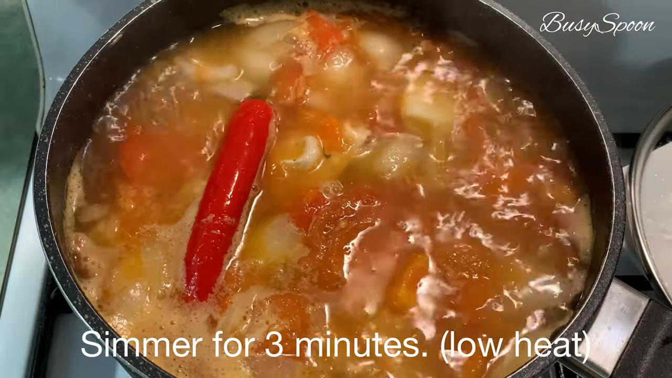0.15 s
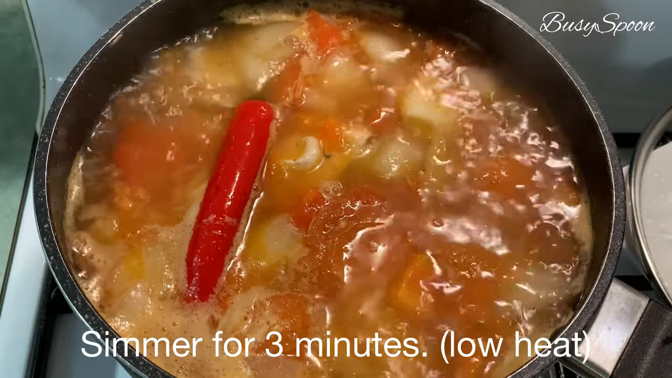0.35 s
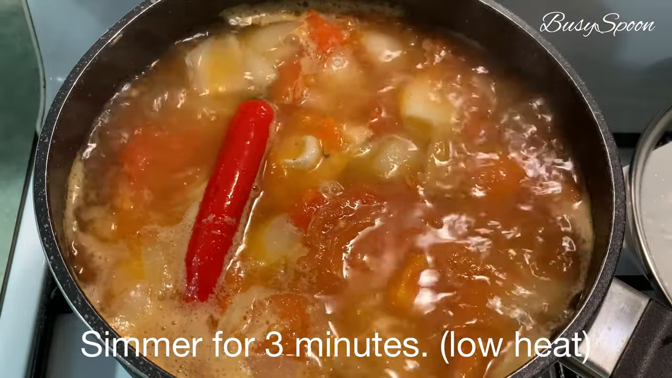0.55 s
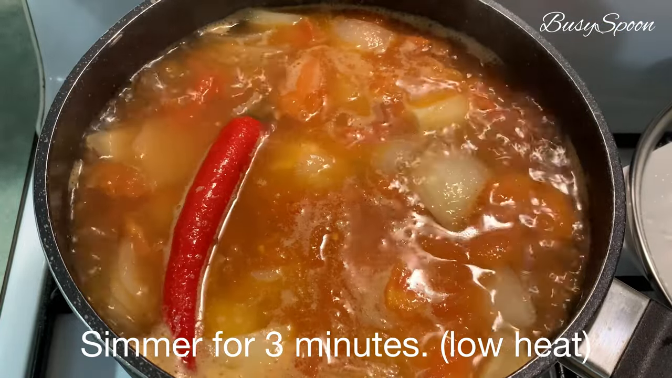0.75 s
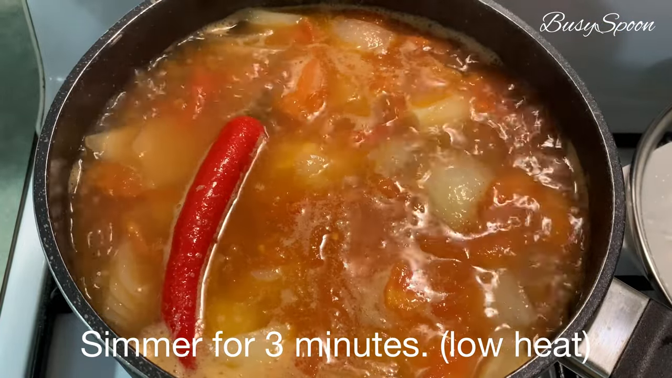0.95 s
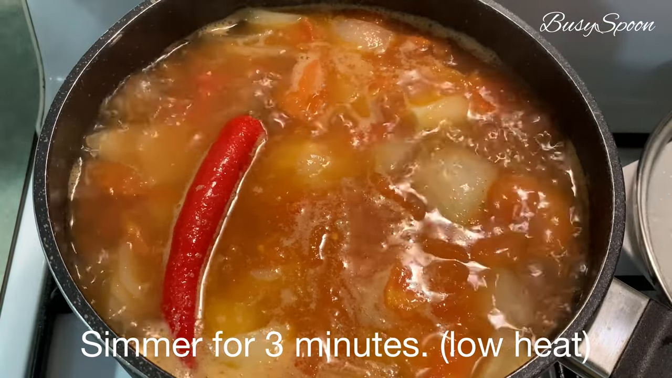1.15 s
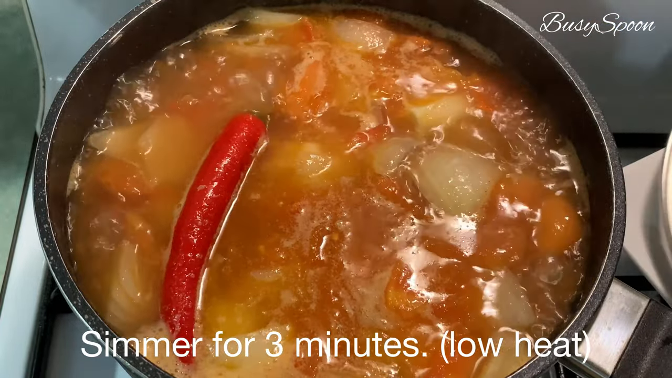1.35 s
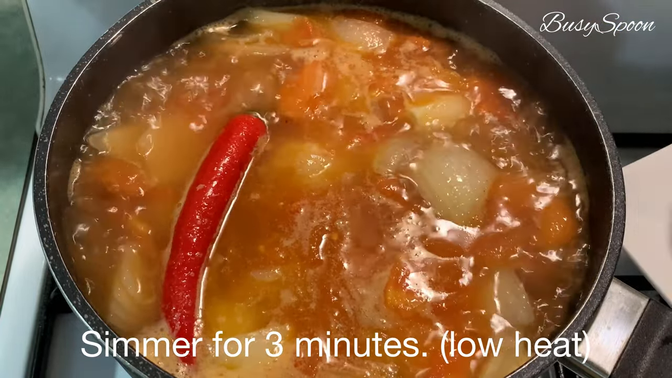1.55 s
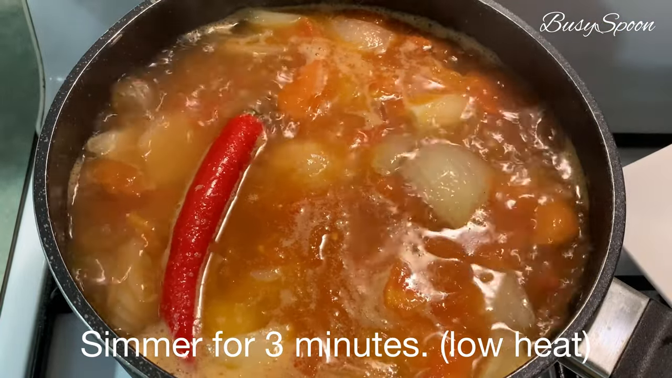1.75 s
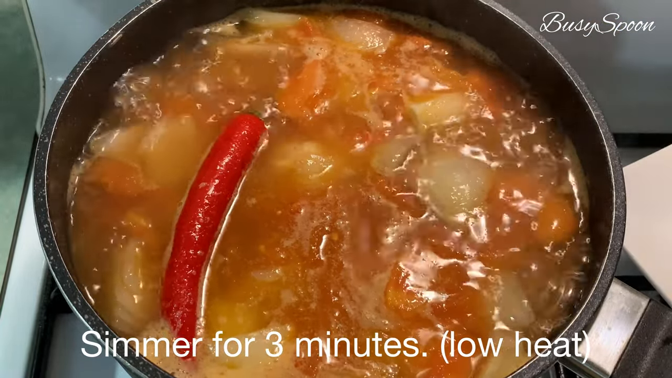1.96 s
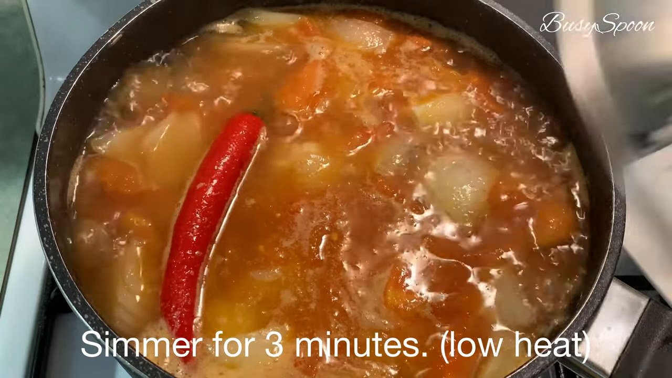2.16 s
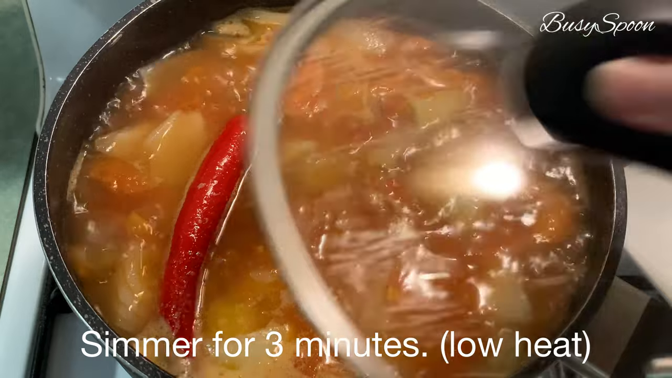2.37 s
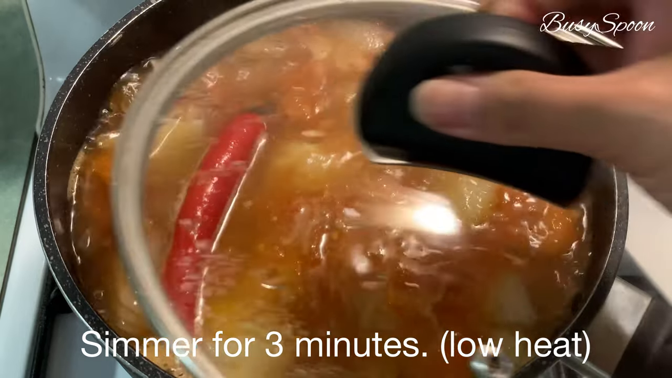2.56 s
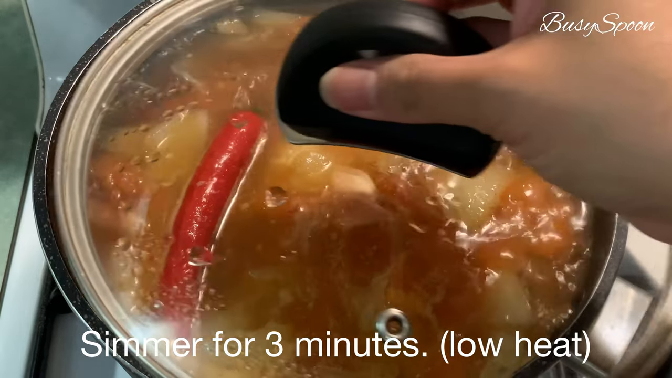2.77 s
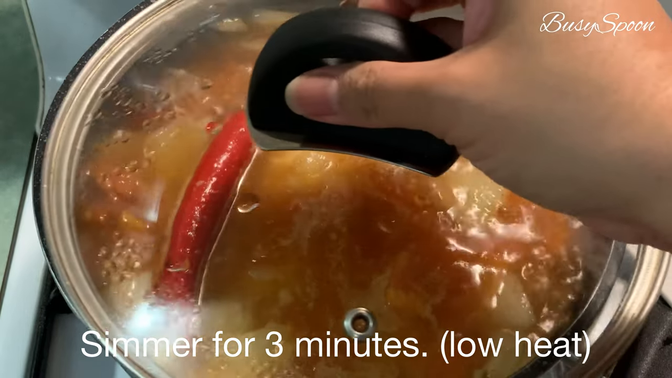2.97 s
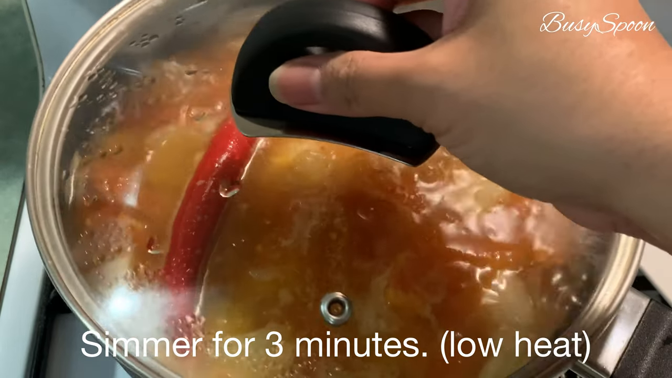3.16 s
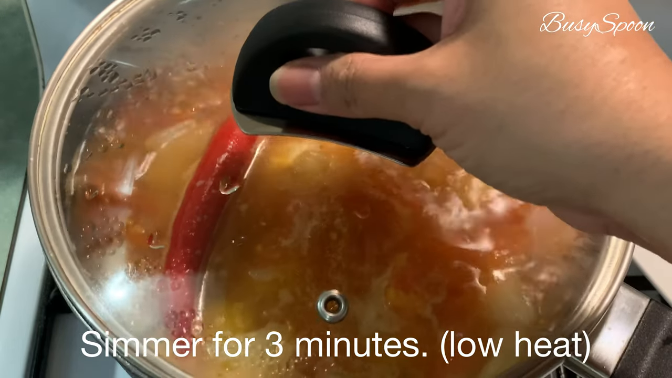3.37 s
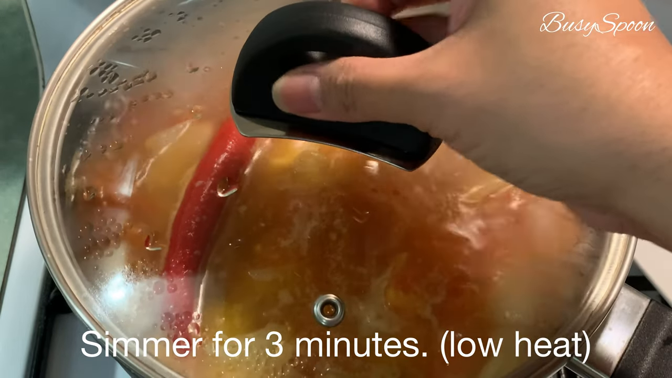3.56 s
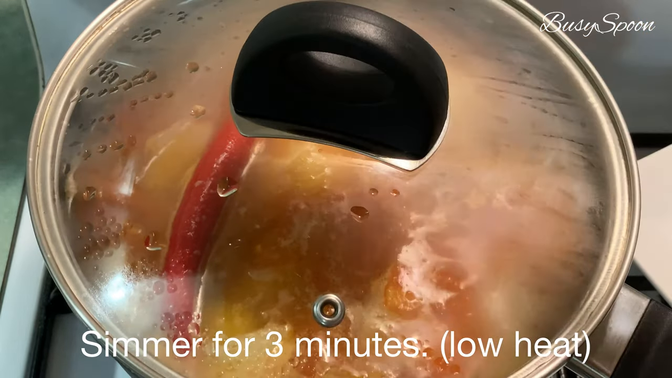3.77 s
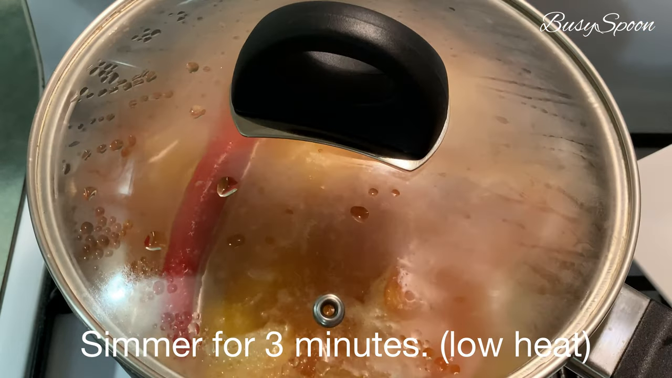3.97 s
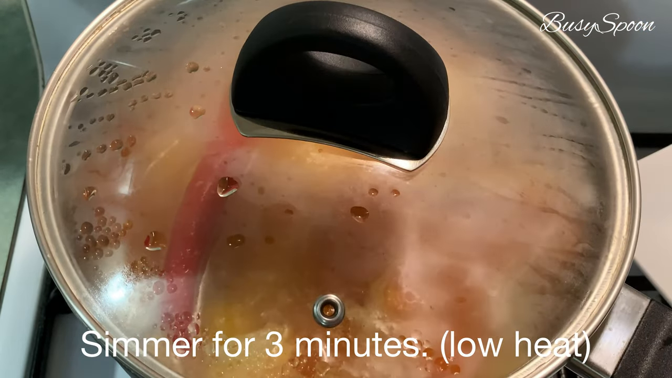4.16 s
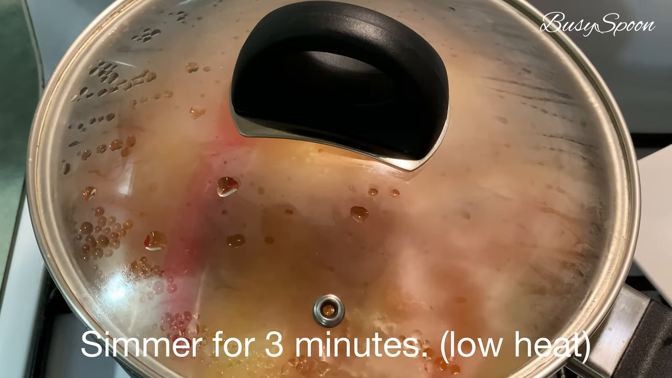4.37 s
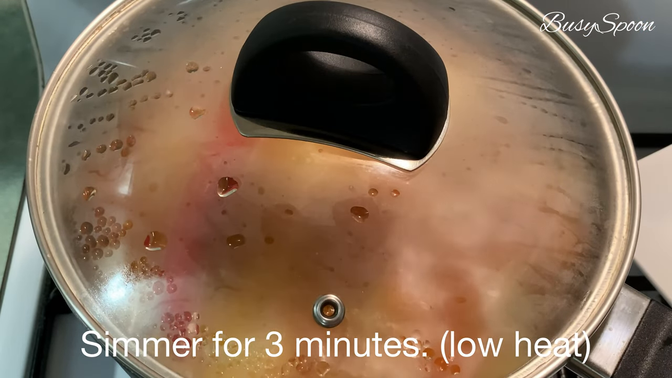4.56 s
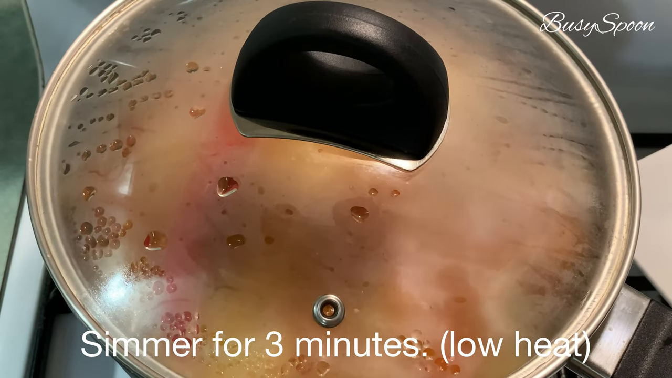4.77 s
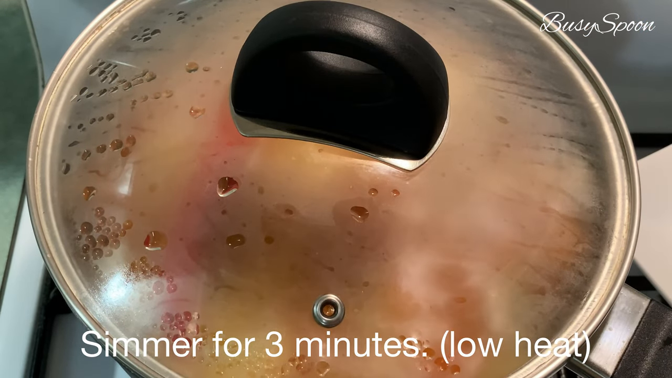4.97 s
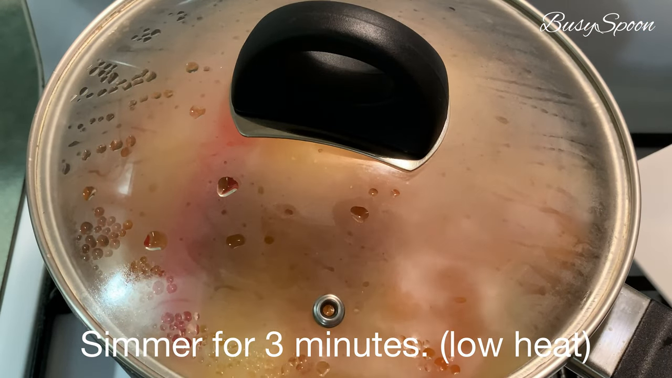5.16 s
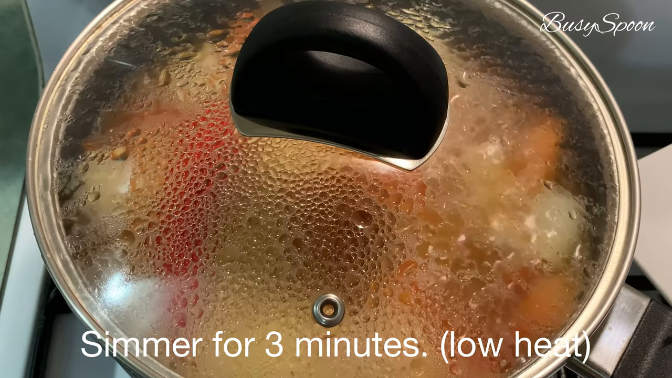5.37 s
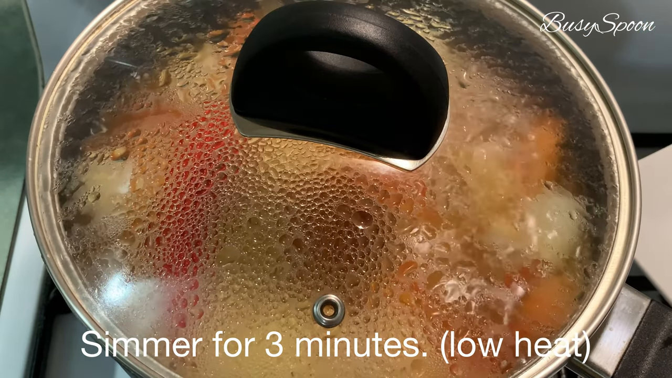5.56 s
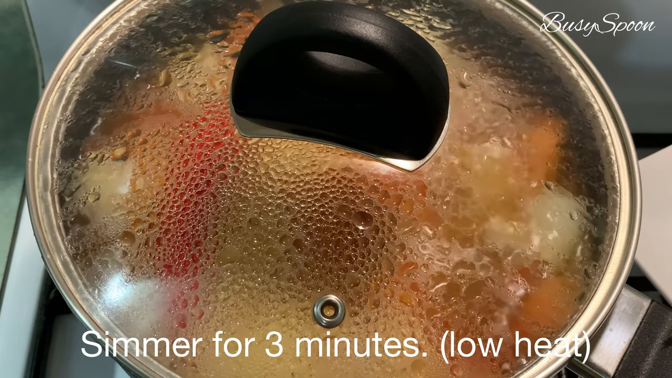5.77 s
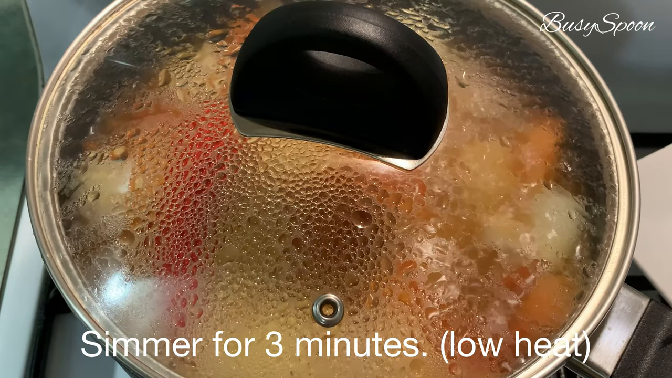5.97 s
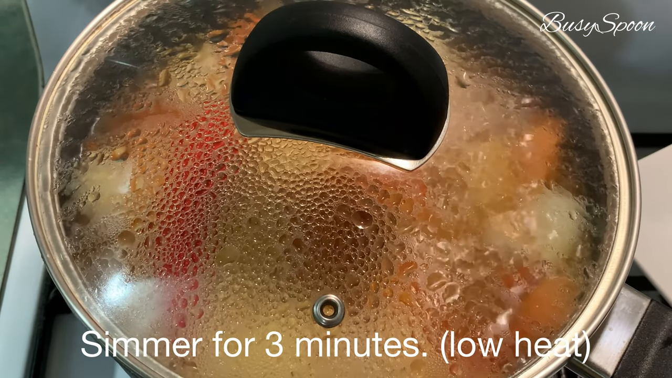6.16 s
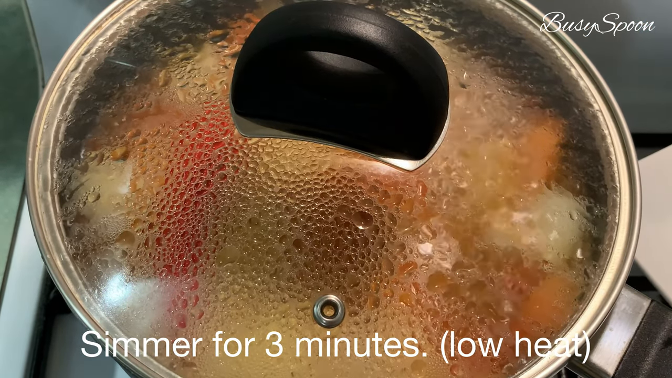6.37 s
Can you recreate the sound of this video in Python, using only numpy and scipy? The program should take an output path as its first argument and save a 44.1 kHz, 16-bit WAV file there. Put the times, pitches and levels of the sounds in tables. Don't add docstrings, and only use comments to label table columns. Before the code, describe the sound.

Thick soup simmers near the microphones, popping and spitting, with low burner rumble and airy hiss. Fine fizz grows crisp while a glass lid with a metal rim slides and clatters on a counter. It strikes the pot sharply, bounces, tilts and drops into place. The boil turns dull and low; cooling metal clicks, jars and glasses touch farther off, and a fridge motor rises in the short-echo kitchen.

```python
import sys
import numpy as np
from scipy import signal
from scipy.fft import rfft, irfft, next_fast_len
from scipy.io import wavfile
from scipy.ndimage import uniform_filter1d

SR = 44100
rng = np.random.default_rng(int(sys.argv[2]) if len(sys.argv) > 2 else 0)


def wav_out(sig):
    wavfile.write(sys.argv[1], SR, np.round(np.clip(np.atleast_2d(sig).T, -1, 1) * 32767).astype(np.int16))


def ratio(d):
    e = np.asarray(d, float) / 20
    return 10 ** e


N = 283122
T = np.arange(N) / SR

# start_s, end_s
VIEWS = [
    (0, .643),
    (.643, 5.31),
    (5.31, 6.43),
]

# pitch_hz, likeness_0_to_1
ALIKE = [(60, 1), (200, 0.53), (500, 0.17), (2000, 0.13), (3600, 0.4), (5000, .93), (8000, .997)]
# pitch_hz, likeness_0_to_1
ALIKE_FIRST = [(60, 1), (500, 0.75), (3000, 0.35), (5500, 0.064), (11000, 0.072), (13000, 0.3)]
# pitch_hz, phase_rad
LAG = [(0, 0), (1640, .3), (3400, .9), (5000, 3.14), (16000, 18.85)]
# pitch_hz, phase_rad
LAG_FIRST = [(0, 0), (4800, -.2), (7000, 2.4), (12500, 2.9), (16000, 5)]
# pitch_hz, level_db
LEAN = [(60, 0.5), (140, 2.5), (330, 0), (600, 3), (2700, 2.5), (5000, 2), (8500, 0)]
# pitch_hz, decay_s
KITCHEN_ECHO = [(100, 0.076), (500, 0.33), (2000, 0.12), (6000, 0.24), (15000, 0.037)]

# time_s, pitch_hz, level_db
FRIDGE = [
    (5.6, 119.3, -61.5),
    (6.03, 119.4, -53.5),
    (6.346, 119.6, -56.5),
    (6.42, 123, -56),
]
FLAME_HZ = [408, 155.6, 171]
FLAME_DB = [-60.5, -62.5, -64]
# pitch_hz, level_db (per Hz)
RUMBLE = [
    [(20, -50), (60, -36), (90, -24), (135, 13), (200, -11.5), (260, 0), (420, -9), (540, -15.5),
     (830, -7.5), (1190, -17.5), (1850, -8.5), (2450, -23.5), (4000, -28.5), (6000, -54)],
    [(20, -12.5), (35, -9), (60, 8), (85, -2.5), (120, -1), (165, -0.5), (200, -15), (320, -6), (460, -20),
     (760, -12), (985, -33), (1250, -23.5), (2200, -32.5), (4500, -56)],
    [(20, -21), (35, -18), (60, 7.5), (85, -4.5), (120, -1.5), (165, 0), (200, -23), (320, -2.5),
     (430, -24.5), (600, -15), (960, -27.5), (1250, -22.5), (2030, -36), (4500, -40.5)],
]
# pitch_hz, level_db (per Hz)
HISS = [
    [(1500, -36), (3000, -1.5), (6000, -17), (10000, -8.5), (15500, -18), (16200, -34)],
    [(1500, -6.5), (3000, 2), (6000, 1.5), (10000, -5.5), (15500, 1.5), (16200, -19.5)],
    [(1500, -17), (3000, -7.5), (6000, -2), (10000, 23), (13000, 41), (15500, 34), (16200, -19.5)],
]

# time_s, change_db
VIGOUR = [
    [(0, -2.5), (.466, -1), (.643, -3)],
    [(.64, -4), (.82, -1.5), (1.01, 0), (1.93, -5), (2.44, -1), (2.94, -6.5), (3.13, -0.5), (3.93, -2.5),
     (4.36, -0.5), (5.31, -3)],
    [(5.31, -1.5), (5.55, 1.5), (5.85, -1), (6.16, 3), (6.42, -1)],
]
RUMBLE_DB = [-50.5, -51, -56]
BOIL_DB = [-57.5, -58.5, -61.5]
FIZZ_DB = [-69.5, -59.5, -61]
# start_s, end_s
LID_DOWN_S = (2.44, 3.5)
# grip_s, hold_s, let_go_s, gone_s
HAND_S = (2.44, 2.67, 3.33, 3.618)
LID_BOIL_DB = -2.5

# low_hz, high_hz
BLOW_BANDS = [(90, 300), (300, 1100), (1100, 2600), (2600, 5000), (5000, 16000)]
# pitch_hz, level_db, decay_s
LID_EDGE = [(149, 2, .1), (457, -10, .12), (590, -9, .05), (750, -4, .06), (1205, -17, .07),
            (1575, -17, .04), (2075, -15, .04), (2150, -17, .06), (2890, -4, .05), (2955, -10, .04),
            (3320, -7, .035), (4015, -5, .013), (6120, -14, .016), (7110, -14, .02),
            (275, -9, .04), (1340, -15, .025), (3700, -17, .012), (4600, -15, .012), (5290, -10, .018),
           (6330, -13, .013), (6750, -17, .013), (8270, -18, .013)]
# pitch_hz, level_db, decay_s
LID_FLAT = [(147, 5, 0.07), (475, -14, 0.13), (635.3, 3, 0.064), (724, -2, 0.049), (770, -7, 0.047),
            (1395, -12, 0.04), (1660, -21, 0.047), (2850, -36, .04), (3960, -38, 0.05),
            (5500, -13.5, 0.032), (6160, -19.5, 0.038), (7460, -19, 0.016)]
# pitch_hz, level_db, decay_s
LID_TILTED = [(150, 1.5, 0.027), (389, -9, 0.046), (580, -7, 0.05), (862, -3, .03), (1345, -4.5, 0.028),
              (1650, -10.5, 0.038), (2136, -4, 0.034), (2920, -18.5, 0.063), (4040, -15, 0.045),
              (6000, -22, 0.059)]
# pitch_hz, level_db, decay_s
RIM_CHINK = [(780, 3, .03), (3063, -10, 0.038), (3900, -8, 0.06), (4470, -9.5, .02), (5270, 9, 0.023),
             (6170, -7, .02), (7040, -2, 0.022)]
# pitch_hz, level_db, decay_s
LID_SEATED = [(147, 3, .06), (172, 1, .06), (290, -1, .05), (390, -8, .06), (567, -5, .055),
              (937, -12, .05), (1168, -21, .2), (1238, -20, .1), (1663, -26, .04), (2094, -16, .03),
              (2918, -20, .035), (2925, -40, .25), (6180, -28, .025), (6900, -28, .02)]
# pitch_hz, level_db, decay_s
COUNTER = [(478, -3.5, 0.0183), (620.5, -12, 0.074), (722, -3, 0.028), (795.5, -13, 0.073),
           (1292, -22, 0.1), (2300, -19, 0.017), (3450, -22.5, 0.1), (7130, -24, 0.03)]
# pitch_hz, level_db, decay_s
GLASS = [(703, -7, 0.047), (1696, -3, 0.052), (2880, -6, 0.033), (4070, -6, 0.028), (5230, 0, .02),
         (5500, -12, .04), (7050, -7, 0.017)]
# pitch_hz, level_db, decay_s
JARS = [(614, -4, .03), (1370, 0, .03), (2920, -5, .02), (3410, -9, .04), (4360, -8, .018), (5640, -3, .02),
        (7600, -8, .018)]
# pitch_hz, level_db, decay_s
METAL = [(1250, 2.5, .08), (2210, -24, .1), (3330, -20, .05)]

# start_s, click_db, thud_db, ring_db
TICKS = [
    (4.198, -36, -60, -52),
    (4.731, -71.5, -60.5, -76),
    (5.543, -60, -49, -106),
    (6.021, -44.5, -55, -68),
    (6.35, -63.5, -65, -78),
]
# start_s, click_db, thud_db, ring_db
GLASS_HITS = [
    (5.689, -56, -73, -60),
    (5.701, -64, -74, -62),
    (5.713, -71, -73, -63),
]
# start_s, click_db, thud_db, ring_db
JAR_HITS = [
    (5.605, -85, -76, -64.5),
    (5.621, -74, -70, -68),
    (5.631, -64, -70, -66.5),
    (5.642, -52.5, -70, -64),
    (5.652, -58, -70, -74),
    (5.803, -83, -78, -72),
]
# start_s, peak_db, pitch_hz, decay_s
CHIMES = [
    (5.648, -53, 3418, .33),
    (5.689, -51, 5970, .24),
    (5.655, -60, 5985, .1),
    (5.70, -63, 1518, .4),
    (5.55, -63, 3600, .12),
]

# strongest_s, level_db, rise_s, fall_s
RUBS = [
    (.872, -63.5, 0.037, 0.016),
    (1.068, -64, 0.04, 0.18),
    (2.47, -56.5, .035, .01),
    (2.761, -60, 0.019, 0.011),
    (2.945, -62.5, 0.057, 0.09),
    (3.16, -71, 0.09, 0.06),
    (3.595, -83, 0.069, 0.037),
    (5.626, -78, 0.024, .06),
    (5.974, -80, 0.1, 0.037),
]
# pitch_hz, level_db (per Hz)
RUB_TONE = [(800, -17), (2200, -7.5), (3500, -8), (4500, 1), (6200, -5.5), (9000, -9), (15000, -10.5)]
# pitch_hz, boost_db
RUB_SINGS = [(2070, 11), (2940, 8), (3460, 10), (3990, 8), (4340, 4.4), (6160, 3.8), (7280, 8)]

# start_s, click_db, thud_db, ring_db
SPLASH = [
    (0.598, -52, -74, -76),
    (0.607, -39, -66, -75),
    (0.6143, -42.5, -64, -75),
    (.625, -49, -75, -72),
]
# start_s, click_db, thud_db, ring_db
DRAG_HITS = [(.8524, -42, -46.5, -51.5), (.8744, -48, -57, -50), (.997, -55, -62, -59.5),
             (1.013, -63, -51, -62), (1.029, -48, -52, -57), (1.047, -61, -66, -47.5),
             (1.064, -29, -38.5, -30), (1.0814, -40, -61, -33.5), (1.1101, -31, -40.5, -30.5),
             (1.117, -34, -47, -39), (1.1258, -37, -60, -31.5), (1.138, -40, -48, -40),
             (1.1527, -30, -55, -31), (1.161, -33, -45, -39), (1.1794, -35, -44.5, -43),
             (1.5943, -58, -49.5, -61), (1.6245, -50.5, -61, -53), (1.771, -62, -67, -66)]
# start_s, click_db, thud_db, ring_db
EDGE_HITS = [
    (2.4724, -12.5, -35, -20),
    (2.4875, -25, -29, -23),
    (2.5005, -28, -36, -29),
    (2.5533, -46, -42, -29),
]
# start_s, click_db, thud_db, ring_db
CHINKS = [
    (2.744, -70, -59, -48.5),
    (2.755, -51, -72, -74),
    (2.762, -53, -68, -62),
    (2.862, -64, -77, -77),
]
# start_s, click_db, thud_db, ring_db
FLAT_HITS = [
    (2.8755, -62, -58, -42),
    (2.9014, -14.5, -26.5, -23.5),
    (2.9527, -46, -33, -47),
]
# start_s, click_db, thud_db, ring_db
TILT_HITS = [
    (3.0353, -37, -37, -32),
    (3.074, -37.5, -53, -49.5),
    (3.211, -31, -36, -45.5),
    (3.2527, -47, -35, -47),
]
# start_s, click_db, thud_db, ring_db
SEAT_HITS = [
    (3.318, -29, -30, -23.5),
    (3.354, -75, -44, -41.5),
    (3.3974, -81, -40.5, -49.5),
    (3.4298, -79, -44, -49.5),
]

# start_s, peak_db, pitch_hz
POPS = [
    (0.042, -42, 1520),
    (0.048, -26.5, 3800),
    (0.124, -48, 3760),
    (0.199, -44, 3450),
    (0.29, -39.5, 3930),
    (0.3272, -41, 3950),
    (.354, -30.5, 3030),
    (0.6147, -31, 1826),
]
# start_s, peak_db, pitch_hz
PLOPS = [(1.249, -41.5, 1820), (1.803, -48, 1720), (1.51, -47, 900), (5.27, -48, 1200), (1.291, -37, 1390),
         (2.03, -36.5, 1170), (2.226, -35.5, 296), (3.61, -40.5, 1200), (3.813, -44.5, 1220),
         (3.955, -34, 241), (4.568, -41.5, 300), (5.198, -49.5, 2020), (6.0229, -26.5, 3500)]
# start_s, peak_db, pitch_hz
OPEN_POT_SNAPS = [(0.2219, -51, 5500), (0.2598, -51, 5650), (0.3064, -56, 4530), (0.3237, -53, 4520),
                  (0.3324, -54, 4520), (0.3641, -51, 6920), (0.39, -57, 8860), (0.4304, -55, 8780),
                  (0.4823, -46, 5590), (0.5252, -53, 9820), (0.5374, -54, 15100), (0.5544, -54, 15500),
                  (0.5811, -51, 4570),
                  (0.0106, -35.5, 6240), (0.099, -32.5, 8900), (0.416, -35, 9400), (0.72, -37, 10200),
               (0.743, -33, 8000), (0.7977, -31, 11300), (.8219, -37, 11200), (1.394, -34.5, 11600),
               (1.4481, -32, 12100), (1.459, -33, 12700), (1.49, -30, 10500), (1.51, -36, 11900),
               (1.518, -30, 12700), (1.565, -32, 7240), (1.575, -39, 11100), (1.6958, -42, 5430),
               (1.717, -50, 5800), (1.7297, -32, 4200), (1.773, -32.5, 7300), (1.796, -31.5, 4850),
               (1.806, -32.5, 10500), (1.942, -34, 12700), (1.975, -35, 9400), (1.9988, -30.5, 8600),
               (2.017, -33, 7400), (2.077, -36.5, 5200), (2.29, -37, 4840), (2.327, -41, 5300),
                  (0.6774, -40, 4010), (0.9333, -41, 7150), (0.9664, -35, 6800), (1.0141, -41, 6370),
                (1.2316, -39, 7360), (1.2735, -42, 7330), (1.3144, -42, 7190), (1.3483, -32, 6150),
                (1.477, -37, 11300), (1.5479, -38, 7300), (1.6043, -41, 11000), (1.6282, -40, 6540),
                (1.709, -35, 3340), (1.8377, -56, 11300), (1.8881, -40, 7580), (1.9564, -47, 11600),
                (2.1081, -43, 11100), (2.1234, -36, 11200), (2.1364, -50, 6460), (2.153, -45.5, 12400),
                (2.1684, -49, 7200), (2.1904, -49, 7920), (2.2034, -42, 11900), (2.2258, -45.5, 12000),
                (2.2334, -47, 11450), (2.2598, -47, 11660), (2.2777, -42.5, 6830), (2.3017, -44, 7570),
                (2.3404, -48.5, 3352), (2.373, -45.5, 12610), (2.3974, -48.5, 12200), (2.4184, -48, 3077)]
# start_s, peak_db, pitch_hz
LID_SNAPS = [
    (2.4507, -48, 6730),
    (4.398, -55, 10540),
    (5.546, -30, 14000),
    (5.546, -51, 6300),
    (6.34, -58, 13000),
]


def evened(x):
    return x / np.sqrt(np.mean(x ** 2) + 1e-20)


def read(points, hz):
    f, value = np.transpose(points)
    return np.interp(np.log(hz + 1), np.log(f + 1), value)


def add(mix, s, sound):
    part = mix[..., round(s * SR):][..., :sound.shape[-1]]
    part += sound[..., :part.shape[-1]]


def band(x, edges_hz):
    return signal.sosfilt(signal.butter(2, edges_hz, "band", fs=SR, output="sos"), x)


def noise(size, length, gain, alike=ALIKE):
    hz = np.fft.rfftfreq(size, 1 / SR)[:, None]
    s = np.arange(4 * length // size + 5) * size / 4 / SR
    a, b, c, d = rng.standard_normal((len(s), len(hz), 4)).T
    like = np.clip(read(alike, hz), 0, 1)
    left = a + 1j * b
    right = like * left + np.sqrt(1 - like ** 2) * (c + 1j * d)
    z = np.array([left, right]) * gain(hz, s)
    return signal.istft(z, nperseg=size, noverlap=3 * size // 4)[1][:, :length]


def drift(shape, wide, long):
    z = rng.standard_normal(shape[::-1]).T
    return evened(uniform_filter1d(uniform_filter1d(z, wide, 0), long, 1))


def kitchen(x, wet_db):
    tail = noise(256, SR // 2, lambda hz, t: ratio(-60 * t / read(KITCHEN_ECHO, hz)))
    tail *= 1 - np.exp(-np.arange(SR // 2) / SR / 0.00073)
    echo = signal.fftconvolve(np.atleast_2d(x), tail / np.linalg.norm(tail[0]), axes=1)
    return x + ratio(wet_db) * echo[:, :N]


def microphones(x, lag):
    size = next_fast_len(N + 2048)
    hz = np.fft.rfftfreq(size, 1 / SR)
    half = ratio(read(LEAN, hz) / 2) * np.exp(-.5j * np.interp(hz, *np.transpose(lag)))
    return irfft(rfft(x, size) * [half, 1 / half], size)[:, :N]


def controls(k):
    vigour = np.interp(T, *np.transpose(VIGOUR[k]))
    lid = np.interp(T, LID_DOWN_S, [0, 1])
    hand = np.interp(T, HAND_S, [0, 1, 1, 0])
    rumble_db = RUMBLE_DB[k] + vigour + 7.5 * hand
    boil_db = BOIL_DB[k] + 0.22 * vigour + LID_BOIL_DB * lid + 5 * hand
    fizz_db = FIZZ_DB[k] + 0.44 * vigour - 23.5 * lid
    return rumble_db, boil_db, fizz_db


def fridge_hum():
    s, hz, db = np.transpose(FRIDGE)
    turns = np.cumsum(np.interp(T, s, hz)) / SR
    return ratio(np.interp(T, s, db, -99) + 5) * np.sin(2 * np.pi * turns)


def burner_flame(k):
    wander = drift((1, N), 1, 4000)[0]
    turns = np.cumsum(FLAME_HZ[k] + 4 * wander[::-1]) / SR
    return ratio(FLAME_DB[k] + wander) * np.sin(2 * np.pi * turns)


def burner_rumble(k, length, alike, rumble_db, boil_db):
    start, out = VIEWS[k][0], np.zeros((2, N))
    brighter_db = boil_db - BOIL_DB[k] - rumble_db + RUMBLE_DB[k] - LID_BOIL_DB * k / 2

    def gain(hz, t):
        uneven_db = 2.4 * drift((len(hz), len(t)), 8, 3)
        upper = np.clip(np.log2(hz / 180 + 0.00083), 0, 1)
        return ratio(read(RUMBLE[k], hz) + uneven_db + upper * np.interp(t + start, T, brighter_db))

    add(out, start, evened(noise(2048, length, gain, alike)))
    return out * ratio(rumble_db + [1.1, 2.2, 2.3][k])


def steam_hiss(k, length, alike, fizz_db):
    out = np.zeros((2, N))

    def gain(hz, t):
        return ratio(read(HISS[k], hz) + 2.5 * drift((len(hz), len(t)), 14, 10))

    add(out, VIEWS[k][0], evened(noise(256, length, gain, alike)))
    return out * ratio(0.4 * (fizz_db + 91.5) + [-76, -79, -73][k])


def glass_chimes():
    out, t = np.zeros(N), np.arange(SR // 3) / SR
    for s, db, hz, t60 in CHIMES:
        fade = ratio(db - 60 * t / t60) * (1 - np.exp(-t / 0.0026))
        add(out, s, fade * np.sin(2 * np.pi * hz * t))
    return out


def blows(mix, rows, modes, crack_db, crack_s, top_db, rise_s, dull, mid_db, chatter=.22):
    t = np.arange(SR // 4) / SR
    for s, click_db, thud_db, ring_db in rows:
        band_db = [thud_db, *np.linspace(ring_db, click_db + top_db, 4) + [0, *mid_db, 0]]
        tune, turn, apart = rng.uniform(-1, 1, (len(modes), 3)).T
        ring = 0
        for (hz, db, t60), f, p, a in zip(modes, tune, turn, apart):
            step = [[0], [.1 * a * min(hz / 600, 1)]]
            fade = ratio(db + 3 * p - 60 * t / min(t60, .35))
            ring = ring + fade * np.sin(2 * np.pi * (hz * (1 + .004 * f) * t + .25 * p + step))
        ring *= 1 + chatter * evened(uniform_filter1d(rng.standard_normal(len(t)), size=250))
        crack = signal.lfilter([1], [1, -min(dull, .95)], rng.standard_normal(len(t)))
        crack *= ratio(crack_db - 60 * t / crack_s)
        sound = (ring + crack) * (1 - np.exp(-t / rise_s)) * np.minimum(30 * (t[-1] - t), 1)
        for k, (edges, db) in enumerate(zip(BLOW_BANDS, band_db)):
            swell = 1 - np.exp(-t * edges[0] / 1.8)
            part = band(sound, edges) * swell
            add(mix, s, (-1) ** k * ratio(db) * part / np.sqrt(np.mean(part[:, :600] ** 2)))


def far_chinks():
    far = np.zeros((2, N))
    blows(far, GLASS_HITS, GLASS, crack_db=-2, crack_s=0.017, top_db=0.5, rise_s=0.0022, dull=0.81,
          mid_db=(-8, -3), chatter=0.048)
    blows(far, JAR_HITS, JARS, crack_db=-4, crack_s=0.02, top_db=-1.0, rise_s=0.003, dull=0.96,
          mid_db=(1.5, -1.5))
    blows(far, TICKS, METAL, crack_db=6.5, crack_s=0.027, top_db=-5.5, rise_s=0.0035, dull=0.92,
          mid_db=(-6, 2.5))
    return far + glass_chimes()


def lid_rubbing():
    def gain(hz, t):
        sings = 1 + sum(ratio(db) / (1 + ((hz - f) / 60) ** 2) for f, db in RUB_SINGS)
        return sings * ratio(read(RUB_TONE, hz) + 3.5 * drift((len(hz), len(t)), 6, 7))

    grit, pressure = evened(noise(512, N, gain)), 0
    for s, db, rise, fall in RUBS:
        slide_db = np.interp(T, [s - rise, s, s + fall], [db - 18.5, db, db - 11], -140, -140)
        pressure = pressure + ratio(slide_db + 16)
    return grit * pressure


def lid_blows():
    near = np.zeros((2, N))
    blows(near, SPLASH, METAL, crack_db=39, crack_s=0.028, top_db=-12.5, rise_s=0.0013, dull=0.89,
          mid_db=(12, 4))
    blows(near, DRAG_HITS, COUNTER, crack_db=-17.5, crack_s=0.074, top_db=-12.0, rise_s=0.0023, dull=0.64,
          mid_db=(-12, -8))
    blows(near, EDGE_HITS, LID_EDGE, crack_db=-12.0, crack_s=0.035, top_db=-5.5, rise_s=0.00045,
          dull=0.14, mid_db=(-4, -10))
    blows(near, CHINKS, RIM_CHINK, crack_db=-13.0, crack_s=0.02, top_db=-1.5, rise_s=0.0021, dull=0.4,
          mid_db=(-8, 3))
    blows(near, FLAT_HITS, LID_FLAT, crack_db=-16.5, crack_s=0.045, top_db=-15, rise_s=0.00073, dull=0.59,
          mid_db=(-5, -6))
    blows(near, TILT_HITS, LID_TILTED, crack_db=-13.0, crack_s=0.044, top_db=-17.5, rise_s=0.0011, dull=0.86,
          mid_db=(-3, -6))
    blows(near, SEAT_HITS, LID_SEATED, crack_db=-17.5, crack_s=0.026, top_db=-23.5, rise_s=0.00208, dull=1.0,
          mid_db=(-12, 4))
    return near


def bubble(hz, cycles, glide):
    u = np.arange(int(3 * cycles * SR / hz) + 4) * hz / SR
    tone = np.sin(2 * np.pi * u * (1 + glide * u / cycles))
    return tone * np.exp(-2.3 * u / cycles) * (1 - np.exp(-u / 1.2))


def fizz_snaps():
    out, t = np.zeros(N), np.arange(400) / SR
    when, size, pitch = rng.random((19, 3)).T
    open_s = VIEWS[1][0]
    faint = zip(open_s + when * (LID_DOWN_S[0] - open_s), -49 + 7.5 * (2 * size - 1), 5000 + 8500 * pitch)
    for s, db, hz in OPEN_POT_SNAPS + LID_SNAPS + list(faint):
        spray = rng.standard_normal(len(t)) * np.exp(-t / .0016) * np.minimum(t / .0005, 1)
        snap = band(spray, [.68 * hz, min(1.5 * hz, 16000)])
        add(out, s, ratio(db - 5.5) * snap / abs(snap).max())
    return out


def big_bubbles():
    out = np.zeros(N)
    for s, db, hz in POPS:
        add(out, s, ratio(db + 3) * bubble(hz, cycles=8, glide=.03))
    for s, db, hz in PLOPS:
        add(out, s, ratio(db + 4) * bubble(hz, cycles=5, glide=.04))
    return out


def many_bubbles(pitches, per_s, spread_db, cycles, clump_db, clump):
    clumps = ratio(clump_db * drift((1, N), 1, clump)[0])
    hits = rng.random(N) < per_s / SR * clumps / clumps.mean()
    strength = ratio(spread_db * np.minimum(rng.exponential(1, N), 3))
    size = hits * strength * rng.choice([-1, 1], N)
    kind, out = rng.integers(0, len(pitches), N), np.zeros(N)
    for k, hz in enumerate(pitches):
        tone = bubble(hz, cycles * (1 + k % 3 / 2), 0.082)
        out += signal.oaconvolve(size * (kind == k), tone)[:N]
    return evened(signal.sosfilt(signal.butter(2, .8 * pitches[0], "high", fs=SR, output="sos"), out))


def low_boil():
    return many_bubbles(np.geomspace(150, 900, 20), per_s=160, spread_db=6.5, cycles=5, clump_db=2, clump=900)


def fine_fizz():
    return many_bubbles(np.linspace(3600, 14500, 20), per_s=700, spread_db=4, cycles=2.2, clump_db=11,
                        clump=600)


def simmer(k, boil, fizz):
    rumble_db, boil_db, fizz_db = controls(k)
    alike = ALIKE if k else ALIKE_FIRST
    length = round((VIEWS[k][1] - VIEWS[k][0]) * SR)
    background = burner_rumble(k, length, alike, rumble_db, boil_db) + steam_hiss(k, length, alike, fizz_db)
    bubbling = boil * ratio(boil_db + [-5, -4, -6][k])
    fizzing = fizz * ratio(fizz_db + [2.5, -.6, -8][k])
    return background + bubbling + fizzing + burner_flame(k)


def scene():
    events = fridge_hum() + kitchen(far_chinks(), -0.94) + lid_rubbing() + kitchen(lid_blows(), -13.0)
    events += kitchen(big_bubbles() + fizz_snaps(), -14)
    events = signal.lfilter(*signal.iirnotch(192, 4.5, SR), events)
    boil = kitchen(low_boil(), 1)
    fizz = kitchen(fine_fizz(), -9)
    out = np.zeros((2, N))
    for k, (start, end) in enumerate(VIEWS):
        view = microphones(simmer(k, boil, fizz) + events, LAG if k else LAG_FIRST)
        view = signal.sosfilt(signal.butter(4, [80, 24, 24][k], "high", fs=SR, output="sos"), view)
        fade_in = np.clip((T - start) / 0.026 + (k == 0), 0, 1)
        fade_out = np.clip((end - T) / 0.0018, 0, 1)
        out += view * fade_in * fade_out
    return out


def top_cut(x):
    return signal.sosfilt(signal.butter(12, 17150, fs=SR, output="sos"), x)


def record(dry):
    dry = .9 * np.tanh(dry / .9)
    lowpass = signal.firwin(255, 15950, window=("kaiser", 7), fs=SR)
    limited = signal.oaconvolve(dry, lowpass[None], "same")
    return top_cut(limited)


dry = scene()
out = record(dry)
wav_out(out)
```